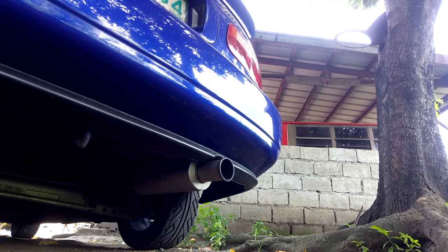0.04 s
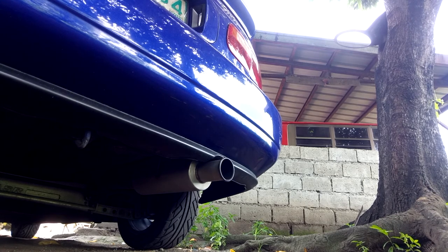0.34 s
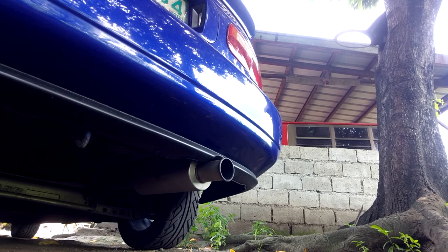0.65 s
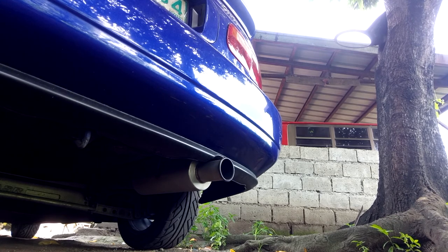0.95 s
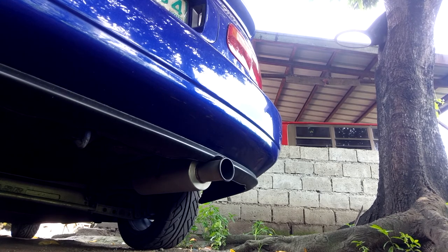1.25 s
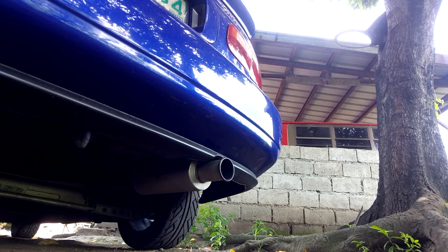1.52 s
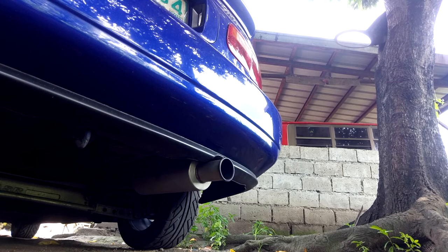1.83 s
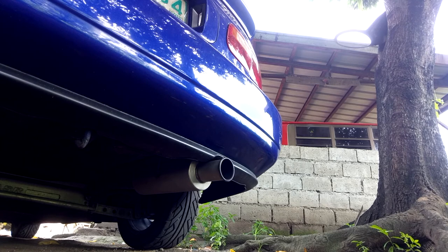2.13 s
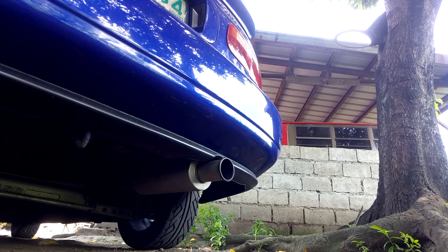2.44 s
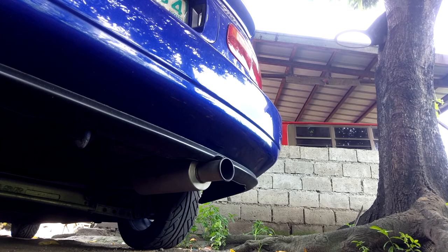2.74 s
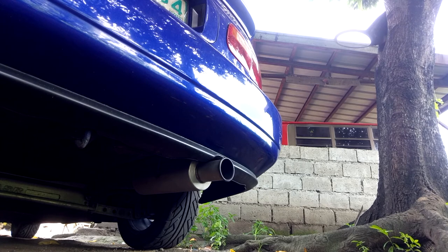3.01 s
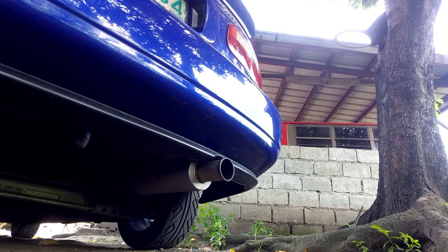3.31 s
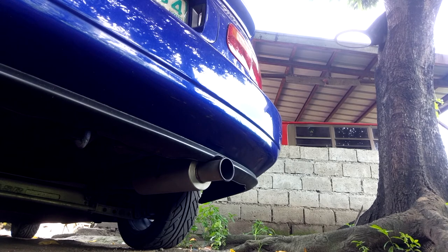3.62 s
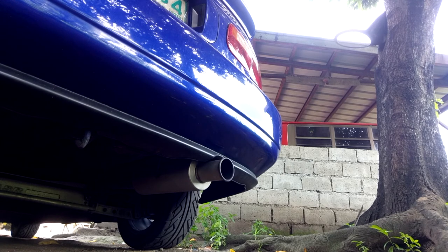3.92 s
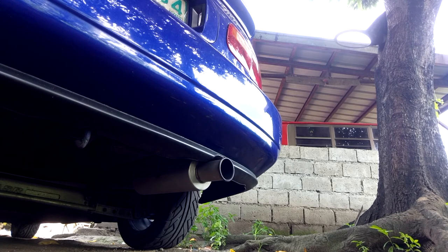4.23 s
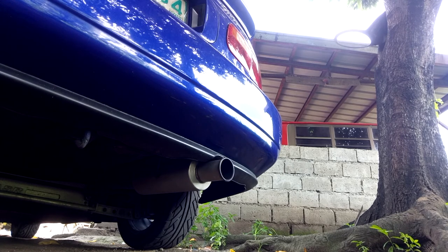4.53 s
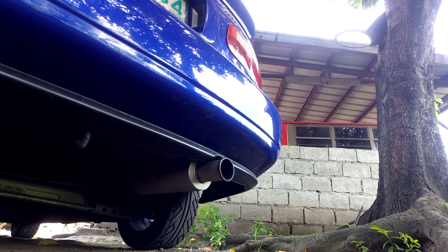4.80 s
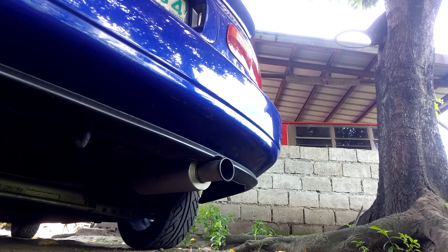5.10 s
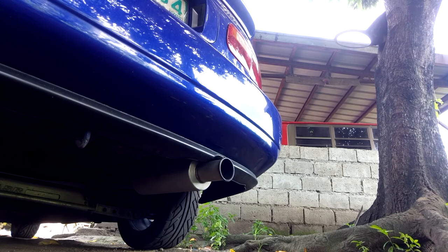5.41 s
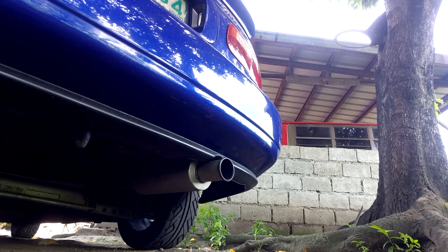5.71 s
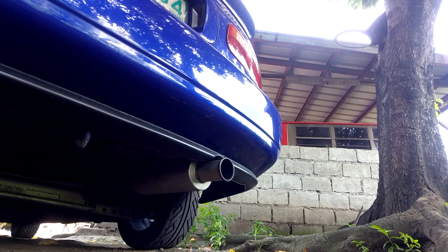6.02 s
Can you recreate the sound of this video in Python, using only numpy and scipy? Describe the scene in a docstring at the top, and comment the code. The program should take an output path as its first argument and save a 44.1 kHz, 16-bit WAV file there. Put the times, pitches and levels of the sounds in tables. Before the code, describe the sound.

A car idles with a low, uneven rumble, then revs three times, barking and crackling through a loud exhaust as it slows.

```python
"""A parked four-cylinder car with a wide open tailpipe, heard from the ground just behind it.
It idles with an uneven beat, then the pedal is stabbed three times. Each firing of a cylinder pushes gas
down the pipe: the pipe booms, barks while the pedal is down, and crackles with late-burning fuel as the
engine slows. Behind it, valves rustle, air hisses into the engine and small birds call in a walled yard.
The close microphone overloads on the peaks."""
import sys
import numpy as np
from scipy import signal
from scipy.fft import rfft, irfft, next_fast_len
from scipy.io import wavfile
from scipy.ndimage import uniform_filter1d

SR = 44100
rng = np.random.default_rng(int(sys.argv[2]) if len(sys.argv) > 2 else 0)


def int16_out(signal):
    """Quantize to a 16-bit WAV file."""
    q = np.round(np.clip(np.atleast_2d(signal).T, -1, 1) * 32767)
    wavfile.write(sys.argv[1], SR, q.astype(np.int16))


N = 271215
T = np.arange(N) / SR
CYLINDER_COUNT = 4
IDLE_ENDS_S, IDLE_FADE_S = 2.78, 0.056
MID_FIRING_HZ = 79.3  # firings per second at middle speed
VACUUM_BUILD_S = 0.091  # time for suction to build behind the shut throttle (the engine's air valve)

# bangs in the pipe from hard firings and late-burning fuel: time_s, level_db, brightness_db_per_octave
PIPE_BANGS = [(2.884, -24, -2), (2.9058, -9.5, -4), (2.9431, -6.5, -2), (2.9597, -7, -3),
              (2.977, -8.5, -0.5), (2.992, -4.5, -1.5), (3.021, -2.5, -1.5), (3.0372, -3, 0),
              (3.0487, 5.5, 3.5), (3.0865, 0.5, -3.5), (3.1223, -5.5, -3), (3.156, -16, -3.5),
              (3.168, -19, -4), (3.4473, -16, -3), (3.4955, -11, -4.5), (3.522, -35.5, -6),
              (3.6111, -21, -6.5), (3.792, -31, -6), (3.82, -30, -3), (3.9391, -14, -13),
              (3.96, -21, -11.5), (4.161, -20, -13.5), (4.2029, -18, -3.5), (4.2174, -17.5, -9),
              (4.2563, -28, -3), (4.302, -28.5, -10), (4.6167, -13, -3.5), (4.641, -9.5, -0.5),
              (4.6525, -4, 2), (4.664, -3, 2.5), (4.6982, 1, 3.5), (4.7431, -6, 7), (4.8431, -13, 3),
              (4.876, -21.5, 9), (4.9006, -18, 5), (5.0472, -16, -3), (5.0811, -14, 1), (5.1135, -16, -0.5),
              (5.1475, -13, -2), (5.1822, -8.5, -1.5), (5.2178, -11, -3), (5.236, -12, -1),
              (5.2877, -16.5, -2), (5.3237, -24, -4), (5.3606, -14, -0.5), (5.3815, -15, -1),
              (5.4203, -12.5, -4), (5.438, -19.5, -3), (5.459, -18, -5), (5.4774, -15.5, -2.5),
              (5.4915, -14.5, -5), (5.5319, -19, -2.5), (5.5743, -21, -0.5), (5.6164, -16, -4.5),
              (5.6598, -16, -3.5), (5.7054, -12.5, -3.5), (5.716, -17, -5), (5.7512, -18, -3),
              (5.765, -17, -1.5), (5.787, -19, -6), (5.813, -18, -2), (5.8359, -13, -6),
              (5.8857, -14.5, -8)]
# tone colour of the exhaust's sharp crack and hiss: pitch_hz, level_db
CRACK_COLOUR = [(800, -12), (1800, 15.5), (2800, 7.5), (4000, 4), (6800, -3), (8000, -25.5), (12000, -20.5),
                (15500, -42.5)]


def undb(db):
    """Turn decibels into a gain."""
    return 10 ** (np.asarray(db) / 20)


def curve(table):
    """Join (time_s, value) points with straight lines, giving one value per sample."""
    return np.interp(T, *np.transpose(table))


def noise():
    """White noise."""
    return rng.standard_normal(N)


def unit(x):
    """Scale a sound to an average (rms) level of 1."""
    return x / np.sqrt(np.mean(x ** 2))


def steady(x, span_s):
    """Hold the level near 1, keeping only changes quicker than span_s."""
    size = int(span_s * SR)
    power = uniform_filter1d(uniform_filter1d(x ** 2, size), size)
    return x / np.sqrt(np.abs(power) + 1e-6 * power.mean())


def pulses(times, sizes):
    """One click at each time."""
    return np.bincount(np.clip(times * SR, 0, N).astype(int), sizes, N + 1)[:N]


def swell(time_s, half_s):
    """A smooth rise and fall around one moment."""
    return np.exp(-((T - time_s) / half_s) ** 2)


def convolve(x, response):
    """Pass a sound through something, given how that thing answers a click."""
    return signal.fftconvolve(x, response)[:N]


def colour(x, points, size=4096):
    """Shape a sound's tone with (pitch_hz, level_db) points."""
    hz, db = np.transpose(points)
    bin_hz = np.arange(size // 2 + 1) * SR / size
    gain = undb(np.interp(np.log(bin_hz + 1), np.log(hz), db))
    # build the filter so that it rings only after a click, never before
    cepstrum = irfft(np.log(gain))[:size // 2]
    cepstrum[1:] *= 2
    return convolve(x, irfft(np.exp(rfft(cepstrum, size))))


def ring(x, modes):
    """Ring fading notes given as (pitch_hz, width_hz, level_db); narrow ones last longer."""
    t = T[:SR // 4]
    response = sum(undb(db) * width / SR * np.exp(-np.pi * width * t) * np.cos(2 * np.pi * hz * t)
                   for hz, width, db in modes)
    return convolve(x, response)


def keep(x, hz, side, order=2):
    """Keep the "low" or "high" side of a sound without delaying it."""
    size = next_fast_len(len(x) + SR // 4)
    ratio = (np.arange(size // 2 + 1) * SR / size / hz) ** (2 * order)
    gain = np.sqrt((1 if side == "low" else ratio) / (1 + ratio))
    return irfft(rfft(x, size) * gain, size)[:len(x)]


def echoes(x, fade_s, low_hz, high_hz, delay_s):
    """Dense reflections, different at each ear, that fall 60 dB in fade_s."""
    t = T[:SR // 2]
    tails = rng.standard_normal((2, len(t))) * undb(-60 * t / fade_s) * (t > delay_s)
    tails /= np.sqrt(np.sum(tails ** 2, axis=1, keepdims=True))
    return np.array([convolve(x, keep(keep(tail, low_hz, "high"), high_hz, "low")) for tail in tails])


def birds(warble=0.051):
    """Small birds sing short gliding notes with a rough warble, echoed by the trees."""
    # bird notes: start_s, length_s, start_hz, end_hz, level_db
    notes = [(0.378, 0.05, 4520, 3780, -51.5), (1.656, 0.041, 5490, 3780, -44),
             (1.737, 0.031, 4120, 5000, -48.5), (2.2, 0.12, 3730, 4900, -49),
             (2.423, 0.077, 3420, 4860, -54.5), (2.316, 0.041, 5500, 3750, -45.5),
             (2.364, 0.012, 3250, 2770, -43), (2.507, 0.016, 4770, 3160, -47.5),
             (2.65, 0.043, 2940, 2590, -45), (2.71, 0.031, 2840, 2340, -44.5),
             (4.075, 0.095, 3860, 3790, -50.5), (4.277, 0.15, 4037, 4150, -51)]
    song = np.zeros(N)
    flutter = 1 + warble * unit(keep(noise(), 220, "low"))
    for start_s, length_s, start_hz, end_hz, db in notes:
        note = (T > start_s) & (T < start_s + length_s)
        progress = (T[note] - start_s) / length_s
        pitch = start_hz * (end_hz / start_hz) ** progress * flutter[note]
        song[note] += undb(db) * np.sin(np.pi * progress) * np.sin(2 * np.pi * np.cumsum(pitch) / SR)
    return 0.5 * song + undb(3.5) * echoes(song, 0.25, 1500, 5700, 0.0027)


def ticks(pitch_hz=12100, width_hz=450):
    """Faint, very high ticks that ring for a millisecond or two."""
    # ticks: time_s, peak_db
    clicks = [(2.075, -46), (2.195, -54), (2.535, -50), (2.755, -52), (2.821, -50), (4.5, -49),
              (4.595, -47)]
    times, db = np.transpose(clicks)
    return ring(pulses(times, undb(db)), [(pitch_hz, width_hz, 0)]) * SR / width_hz


def intake():
    """Air hisses past the barely open throttle in short gusts."""
    # gusts: middle_s, half_length_s, level_db
    gusts = [(2.835, 0.1, -55), (3.332, 0.091, -50.5), (4.052, 0.065, -48.5), (4.485, 0.17, -51),
             (5.182, 0.1, -43), (5.432, 0.087, -47.5)]
    # tone colour of the hiss: pitch_hz, level_db
    hiss_colour = [(800, -16.5), (2000, 1.5), (3500, 1), (5500, -3.5), (7000, -12.5), (8200, -22),
                   (13500, -31), (15000, -14.5)]
    loudness = sum(undb(db) * swell(middle_s, half_s) for middle_s, half_s, db in gusts)
    return loudness * np.array([unit(colour(noise(), hiss_colour)) for _ in range(2)])


def engine_bay(phase, rumble_db=-38, throb=0.53, whine_db=-7):
    """From under the car: a rumble, valves rustling once every four firings, a whine, a deep shudder."""
    # tone colour of the rumble: pitch_hz, level_db
    rumble_colour = [(20, 6), (45, 2.5), (150, 6.5), (400, 5.5), (600, 3.5), (1000, -5.5), (1500, -13.5),
                     (2500, -30), (4900, -26.5), (6500, -35), (7500, -55.5), (15000, -44)]
    # tone colour of the valves: pitch_hz, level_db
    valve_colour = [(900, 1.5), (1500, -12.5), (2400, 2.5), (3300, -0.5), (4950, -3.5), (5600, -13.5),
                    (6800, -15.5), (7800, -55)]
    # loudness of the rustle and whine: time_s, level_db
    rustle_levels = [(0, -53), (1.85, -55.5), (2.1, -57.5), (2.6, -57.5), (6.15, -59.5)]
    rumble = np.array([unit(colour(noise(), rumble_colour)) for _ in range(2)]) * undb(rumble_db)
    rustle = unit(colour(noise(), valve_colour))
    rustle *= 1 + throb * np.cos(2 * np.pi * phase / CYLINDER_COUNT)
    whine = unit(ring(noise(), [(1730, 55, 0), (4875, 90, -7)])) * undb(whine_db)
    shudder_db = np.where(T > IDLE_ENDS_S, -32.2, -40)
    shudder = unit(keep(keep(noise(), 30, "low", order=3), 14, "high")) * undb(shudder_db)
    machinery = (rustle + whine) * undb(curve(rustle_levels))
    return rumble + shudder + echoes(machinery, 0.16, 500, 7700, 0.0055)


def shock_share(crack_db, onset_db=-56, span_db=16):
    """How much of the treble comes as sharp pressure jumps instead of a smooth rush of gas."""
    return np.clip((crack_db - onset_db) / span_db, 0.04, 0.9)


def jet(firing_hz, crack_db, revved, roar_db=-35):
    """Gas swirls behind the tailpipe: a hiss that follows the crack and a roar that grows with speed."""
    # tone colour of the roar: pitch_hz, level_db
    roar_colour = [(60, 3), (120, -1), (300, -1.5), (500, 19), (900, -13.5), (1500, -19), (2500, -29.5),
                   (6800, -57.5)]
    hiss = unit(colour(noise(), CRACK_COLOUR)) * np.sqrt(8.5 - shock_share(crack_db)) * undb(crack_db - 8)
    roar = unit(colour(noise(), roar_colour)) * (firing_hz / firing_hz.max()) ** 2 * undb(roar_db)
    return hiss * revved + roar


def blasts(phase, throb=0.99):
    """On the hardest stabs the jet of gas buffets the microphone and rasps in time with the firings."""
    # blasts of gas: middle_s, half_length_s, buffet_db, rasp_db
    gusts = [(3.065, 0.053, -28, -33.5), (4.74, 0.039, -8.5, -22)]
    # tone colour of the rasp: pitch_hz, level_db
    rasp_colour = [(600, -14.5), (1200, 5.5), (1800, 11), (2600, 2.5), (5000, -1.5), (7000, -11),
                   (8500, -24), (15000, -27.5)]
    buffet = unit(keep(keep(noise(), 75, "low"), 31, "high"))
    rasp = unit(colour(noise(), rasp_colour)) * (1 + throb * np.cos(2 * np.pi * phase))
    return sum(swell(middle_s, half_s) * (undb(buffet_db) * buffet + undb(rasp_db) * rasp)
               for middle_s, half_s, buffet_db, rasp_db in gusts)


def chug(firings, start_hz=144.3, end_hz=95.8, lag_firings=0.47, waver_db=3.6):
    """Once every four firings the idle's deep note swells and sags in pitch, never equally loud."""
    cycles = (np.interp(T, firings, np.arange(len(firings))) - lag_firings) / CYLINDER_COUNT
    progress = cycles % 1
    strength = undb(waver_db * rng.standard_normal(len(firings)))[np.floor(cycles).astype(int)]
    pitch = start_hz + (end_hz - start_hz) * progress
    return unit(strength * np.sin(np.pi * progress) * np.sin(2 * np.pi * np.cumsum(pitch) / SR))


def idle(firings, level_db=-18.5, scatter_db=2.8, jitter_s=0.00077, tone_hz=489):
    """Unequal cylinders each ring the pipe their own way, so the beat limps once every four firings."""
    # the cylinders in firing order: late_by_firings, deep_db, upper_db
    cylinders = [(-0.039, 1.5, -23.5), (-0.002, 4, -8.5), (-0.092, 1, -3.5), (-0.042, -6, -3)]
    # deep notes of the pipe: pitch_hz, width_hz, level_db
    deep_notes = [(86, 8.6, 1), (122.8, 12.3, -1)]
    # upper notes of the pipe: pitch_hz, width_hz, level_db
    upper_notes = [(226.6, 19.6, 2), (262.8, 9.8, 5), (298.1, 8.2, 1.5), (380.4, 14, -2.5)]
    late, deep_db, upper_db = np.array(cylinders)[np.arange(len(firings)) % CYLINDER_COUNT].T
    time_luck, deep_luck, upper_luck = rng.standard_normal((len(firings), 3)).T
    times = firings + late * np.gradient(firings) + jitter_s * time_luck
    idling = firings < IDLE_ENDS_S + IDLE_FADE_S
    deep = pulses(times, idling * undb(deep_db + scatter_db * deep_luck))
    upper = pulses(times, idling * undb(upper_db + scatter_db * upper_luck))
    upper += 0.5 * upper.std() * noise()  # swirling gas keeps these notes going between firings
    deep = keep(keep(ring(deep, deep_notes), 290, "low", order=3), 60, "high")
    upper = keep(keep(ring(upper, upper_notes), 292.3, "low", order=6), 120, "high", order=4)
    # one slow-fading note of the pipe sings on steadily
    tone = steady(keep(ring(noise(), [(tone_hz, 9, 0)]), 3400, "low"), 0.82) * undb(-23)
    rumble = steady(deep + undb(-0.5) * upper, 0.98) + undb(-2) * chug(firings)
    return (steady(rumble, 0.72) + tone) * undb(level_db)


def pedal(full_return_s=0.2, return_power=4.26, release_s=0.023):
    """Each stab opens the throttle; it springs shut and leaves a vacuum until the next stab."""
    # stabs at the pedal: start_s, press_s, hold_s, opening (0 to 1)
    stabs = [(2.75, 0.34, 0.01, 0.54), (4.001, 0.2, 0.0083, 0.38), (4.567, 0.12, 0.075, 0.91)]
    throttle, vacuum = np.zeros(N), np.zeros(N)
    next_starts = [row[0] for row in stabs[1:]] + [np.inf]
    for (start_s, press_s, hold_s, opening), next_s in zip(stabs, next_starts):
        lift_s = start_s + press_s + hold_s
        return_s = full_return_s * np.sqrt(opening)
        closing = np.clip((T - lift_s) / return_s, 0, 1) ** return_power
        throttle += opening * np.clip((T - start_s) / press_s, 0, 1) * (1 - closing)
        building = (T - lift_s - return_s) / VACUUM_BUILD_S
        vacuum += opening * np.clip(np.minimum(building, (next_s - T) / release_s), 0, 1)
    return throttle, vacuum


def exhaust_levels(firing_hz, throttle, vacuum, afterburn):
    """How strong the boom, drone, bark and crack are, from the pedal, the speed and late-burning fuel."""
    # firing rates that make the pipe boom: rate_hz, width_hz, level_db
    boom_rates = [(84.3, 10.6, -1.5), (119.4, 10, -4)]
    octaves = np.log2(firing_hz / MID_FIRING_HZ)
    drone_db = 7.5 * throttle ** 0.35 + 4.5 * afterburn + 2.5 * octaves
    bark_db = -35 + 27 * throttle ** 0.93 + 21.5 * afterburn + 2.5 * octaves
    crack_db = -56 + 34.5 * throttle ** 4 + 6.5 * afterburn + 5.5 * octaves
    resonance = np.sqrt(sum(undb(db) ** 2 / (1 + (2 * (firing_hz - hz) / width) ** 2)
                            for hz, width, db in boom_rates))
    # cylinders blow with the pedal down and suck with it up, so the boom passes through zero between
    boom_gain = undb(-7.5) * resonance * (np.sqrt(vacuum) - throttle)
    drone_db -= 3 * resonance  # the drone gives way to the boom
    return boom_gain, drone_db, bark_db, crack_db


def burble(firings, phase, push_db):
    """Uneven pushes of hot gas ring the pipe."""
    # notes of the pipe in fast, hot flow: pitch_hz, width_hz, level_db
    hot_notes = [(114, 74, -0.5), (131, 52, -6), (227, 7.6, 7), (264, 29, 4), (308, 13, 2.5)]
    push = undb(push_db)
    lowest_note = 2 * np.gradient(phase) * np.cos(2 * np.pi * phase)
    overtones = pulses(firings, push / push.mean()) - lowest_note
    ringing = ring(unit(overtones) + 0.3 * noise(), hot_notes)
    return steady(keep(keep(ringing, 63, "high", order=3), 610, "low", order=6), 0.039)


def drone(phase, vacuum, waver_db=2, drift_turns=0.059):
    """The pipe sings at multiples of the firing rate; unequal cylinders add the tones in between."""
    # engine tones: multiple_of_firing_rate, pulling_db, coasting_db
    tones = [(0.75, -31, -24.5), (1.25, -30.5, -24.5), (1.5, -55.5, -38.5), (1.75, -22, -21),
             (2.0, -25.5, -21), (2.25, -31.5, -32), (2.5, -35.5, -32.5), (2.75, -30.5, -20.5),
             (3.0, -17.5, -25.5), (3.25, -33.5, -31), (3.5, -35, -33.5), (3.75, -29, -27),
             (4.0, -22.5, -29.5), (4.25, -33, -30), (4.5, -36, -30.5), (4.75, -41.5, -31), (5.0, -23, -29)]
    # how the hot pipe favours each pitch: pitch_hz, level_db
    pipe_colour = [(55.0, -13.5), (85.0, -1.5), (105.0, -5), (125.0, 5), (145.0, -1.25), (170.0, -2.5),
                   (195.0, -11.5), (225.0, -5.5), (260.0, -2), (305.0, -1), (350.0, -3), (420.0, -9),
                   (500.0, -6.5), (650.0, -3.5)]
    pipe_hz, pipe_db = np.transpose(pipe_colour)
    firing_hz = np.gradient(phase) * SR
    out = np.zeros(N)
    for multiple, pulling_db, coasting_db in tones:
        waver, sway = (np.interp(T * 7, np.arange(64), rng.standard_normal(64)) for _ in range(2))
        db = pulling_db + (coasting_db - pulling_db) * vacuum + waver_db * waver
        db += np.interp(multiple * firing_hz, pipe_hz, pipe_db)
        lag = rng.random() * (multiple % 1 > 0) + drift_turns * sway
        out -= np.sqrt(2) * undb(db) * np.sin(2 * np.pi * (multiple * phase + lag))
    return out


def bark(times, front_db, puff, bark_db, edge_hz=980):
    """Each firing leaves as a steep pressure front and a puff of gas; the louder, the more it snarls."""
    # tone colour of the bark: pitch_hz, level_db
    bark_colour = [(200, -42.5), (340, -2.5), (480, 2), (690, 3), (860, -1.5), (1050, -9), (1350, -18.5),
                   (1600, -24.5), (2000, -28), (2800, -40), (6000, -62)]
    fronts = steady(-pulses(times, undb(front_db)), 0.06) + 0.45 * unit(puff * noise())
    bright = steady(colour(fronts, bark_colour), 0.029)
    dull = keep(bright, edge_hz, "low", order=5)
    snarl = np.clip((bark_db + 40) / 22, 0.3, 1.4)
    return (dull + snarl * (bright - dull)) * undb(bark_db + 0.87)


def spit(times, front_db, pressure_db, threshold_db=-10.5, level_db=-39):
    """Only fronts above a certain pressure break into a spit, and the very loud ones level off."""
    # tone colour of a breaking front: pitch_hz, level_db
    spit_colour = [(400, -8), (900, 3.5), (1400, 5.5), (2100, 1), (2800, -8.5), (3600, -8.5), (6500, -18),
                   (9000, -65.5)]
    peak_db = np.interp(times, T, pressure_db) + np.minimum(front_db, 5)
    broken = 1 / (1 + undb(2 * (threshold_db - peak_db)))
    return unit(colour(-pulses(times, broken * undb(0.5 * peak_db)), spit_colour)) * undb(level_db)


def crack(times, front_db, puff, crack_db):
    """Strong firings steepen into sharp shocks, which grow with the square of the pressure."""
    shocks = steady(-pulses(times, undb(2 * front_db)), 0.031)
    cracks = steady(colour(shocks + 0.5 * unit(puff * noise()), CRACK_COLOUR), 0.054)
    return cracks * np.sqrt(shock_share(crack_db)) * undb(crack_db - 3.5)


def bangs(puff_s=0.0071, pivot_hz=1500, size=2048):
    """Each bang leaves the pipe as a steep front and a short rough puff, with its own brightness."""
    # tone colour of a bang: pitch_hz, level_db
    bang_colour = [(120, -24), (400, 4), (750, 5), (1100, -5), (1500, -3), (2000, -8), (2700, -11.5),
                   (3800, -18.5), (6500, -24), (9000, -44), (15000, -45)]
    hz, db = np.transpose(bang_colour)
    octaves = np.log2(np.maximum(hz, 500) / pivot_hz)
    out = np.zeros(N + 2 * size)
    t = T[:size]
    for time_s, level_db, brightness in PIPE_BANGS:
        front = colour(np.ones(1), np.c_[hz, db + brightness * octaves], size=size)
        puff = keep(keep(rng.standard_normal(size), 820, "high"), 3500, "low")
        puff *= np.exp(-t / puff_s) * np.sqrt(2 / (puff_s * SR))
        bang = signal.fftconvolve(front / np.abs(front).max(), (t == 0) + undb(-4) * puff)
        start = int(time_s * SR)
        out[start:start + len(bang)] -= undb(level_db) * bang
    return out[:N]


def revving(firings, phase, levels, throttle, vacuum, afterburn, jitter_s=0.00017):
    """The racing engine: every firing pumps the pipe, rings it and bursts out of its open end."""
    # how late each cylinder fires: late_by_firings
    lateness = [-0.012, 0.021, -0.038, -0.042]
    # how hard each cylinder blows: level_db
    strengths = [1, -4.5, -2, 1]
    boom_gain, drone_db, bark_db, crack_db = levels
    uneven = 1 - 0.39 * np.sqrt(np.interp(firings, T, throttle))  # an open throttle evens the firings
    time_luck, push_luck, front_luck = rng.standard_normal((len(firings), 3)).T * uneven
    # uneven spacing adds a growl
    firings = firings + uneven * np.resize(lateness, len(firings)) * np.gradient(firings)
    times = firings + jitter_s * time_luck
    bang_times = np.array(PIPE_BANGS)[:, 0]
    nearest = np.abs(times[:, None] - bang_times).argmin(axis=0)
    times[nearest] = bang_times  # the nearest firing lands right on each bang
    blow_db = uneven * np.resize(strengths, len(firings))
    front_db = blow_db + 3 * front_luck
    puff = np.exp(-(phase % 1))
    # the gas in the pipe swings once per firing
    boom = np.sqrt(2) * np.cos(2 * np.pi * (phase + 0.32))
    boom *= boom_gain * (1 + 0.016 * unit(keep(noise(), 27, "low")))
    burbling = burble(firings, phase, blow_db + 7 * push_luck) * undb(drone_db - 23.5)
    barking = bark(times, front_db, puff, bark_db)
    spitting = spit(times, front_db, bark_db + 2 * afterburn)  # burning fuel breaks the fronts sooner
    cracking = crack(times, front_db, puff, crack_db)
    droning = drone(phase, vacuum) * undb(drone_db)
    return boom + burbling + droning + barking + spitting + cracking + bangs()


def scene(shade_db=-3, ear_lag_s=0.00013, afterburn_from_s=3.39, afterburn_above_hz=49.3):
    """The tailpipe a little to the left, between ground and bumper, in a walled yard."""
    # engine speed: time_s, firings_per_s
    speed = [(0.0, 34.67), (0.82, 34.49), (1.42, 32.96), (2.75, 31.81), (2.84, 42.84), (2.92, 51.2),
             (3.05, 77.38), (3.14, 86.8), (3.22, 89.98), (3.3, 90.01), (3.45, 83.76), (3.64, 75.09),
             (3.85, 64.37), (3.99, 60.72), (4.1, 64.84), (4.24, 75.44), (4.34, 79.64), (4.45, 78.44),
             (4.57, 74.8), (4.67, 85.96), (4.78, 105.35), (4.88, 121.87), (4.95, 129.41), (5.02, 124.68),
             (5.2, 114.71), (5.4, 104.58), (5.6, 93.57), (5.8, 82.7), (6.0, 71.83), (6.15, 64.75)]
    firing_hz = curve(speed)
    phase = np.cumsum(firing_hz) / SR  # goes up by 1 with every firing
    firings = np.interp(np.arange(int(phase[-1]) + 1), phase, T)
    throttle, vacuum = pedal()
    # with the pedal up, unburnt fuel catches in the pipe, more fiercely at high speed
    afterburn = vacuum * np.clip((firing_hz - afterburn_above_hz) / MID_FIRING_HZ, 0, None)
    afterburn *= np.clip((T - afterburn_from_s) / VACUUM_BUILD_S, 0, 1)
    levels = exhaust_levels(firing_hz, throttle, vacuum, afterburn)
    crack_db = levels[-1]
    revved = np.clip((T - IDLE_ENDS_S) / IDLE_FADE_S + 1, 0, 1)  # 0 at idle, 1 afterwards
    exhaust = np.sqrt(1 - revved) * idle(firings)
    exhaust += np.sqrt(revved) * revving(firings, phase, levels, throttle, vacuum, afterburn)
    # the right ear hears the pipe a little duller and later
    shaded = exhaust - (1 - undb(shade_db)) * keep(exhaust, 1300, "high", order=1)
    direct = np.array([exhaust, np.interp(T - ear_lag_s, T, shaded)])
    underbody = undb(-8) * echoes(exhaust, 0.012, 1300, 9700, 0.00047)
    yard = undb(-14.5) * echoes(exhaust, 0.089, 70, 5000, 0.021)
    birdsong = birds()
    gas = np.array([jet(firing_hz, crack_db, revved) + blasts(phase) for _ in range(2)])
    return direct + underbody + yard + birdsong + engine_bay(phase) + intake() + ticks() + gas


def record(dry, drive_db=2.0, knee=14, top_hz=15800):
    """The microphone flattens the loudest peaks, and the highest treble is cut."""
    driven = dry * undb(drive_db)
    clipped = driven / (1 + np.abs(driven) ** knee) ** (1 / knee)
    return signal.sosfilt(signal.ellip(8, 0.2, 70, top_hz, fs=SR, output="sos"), clipped)


dry = scene()
out = record(dry)
int16_out(out)
```